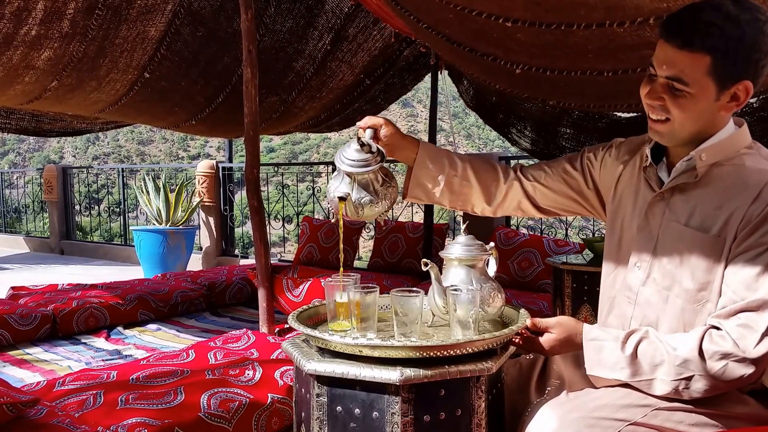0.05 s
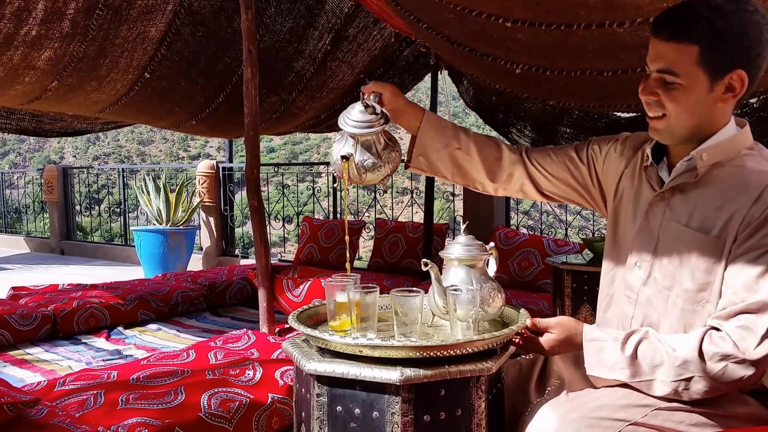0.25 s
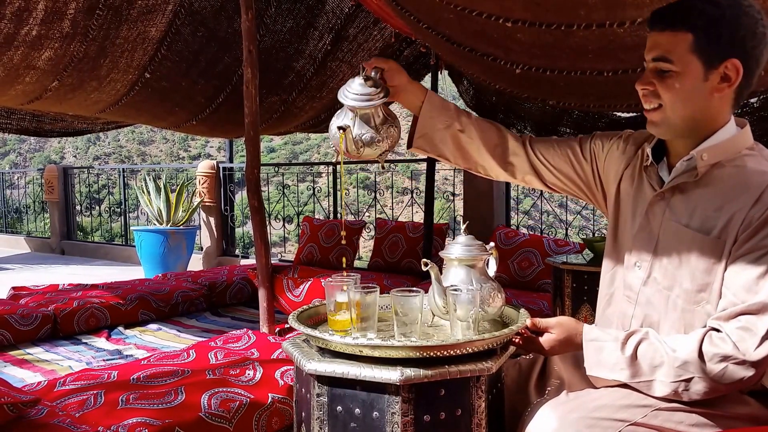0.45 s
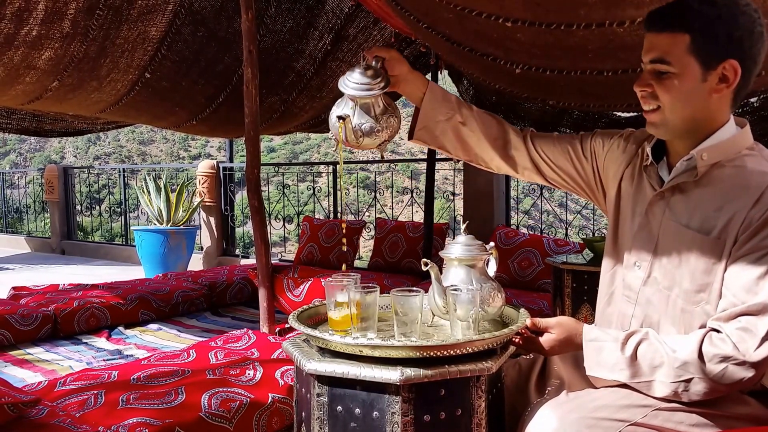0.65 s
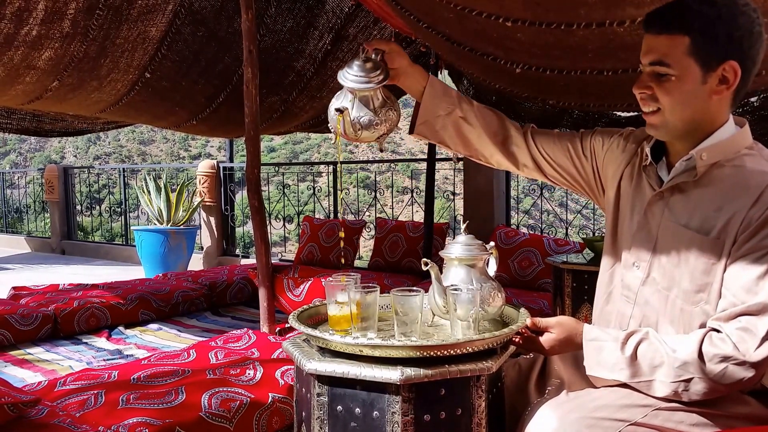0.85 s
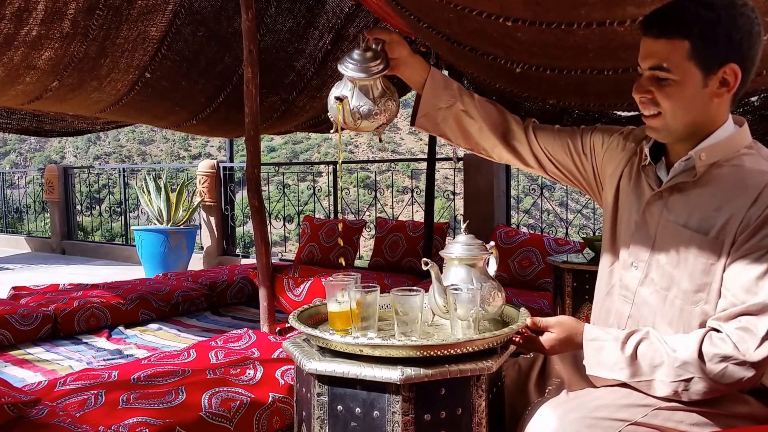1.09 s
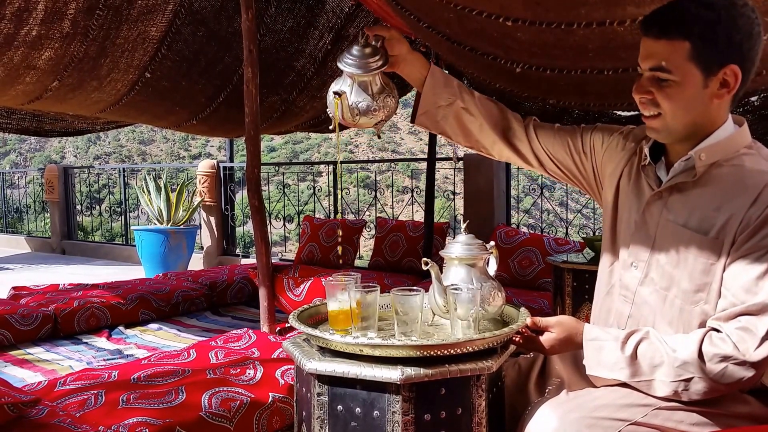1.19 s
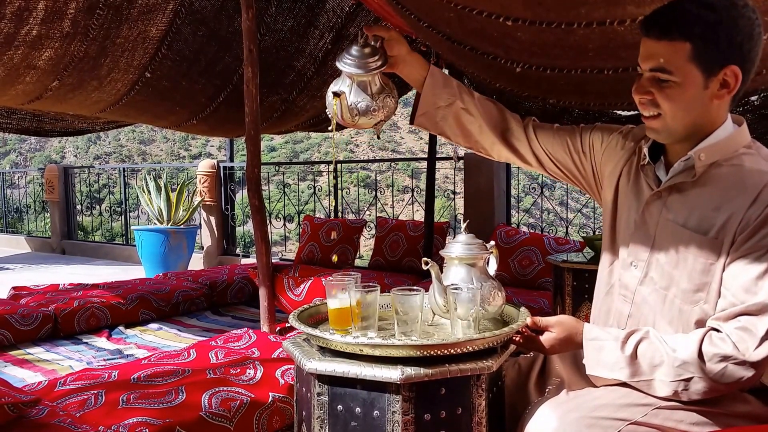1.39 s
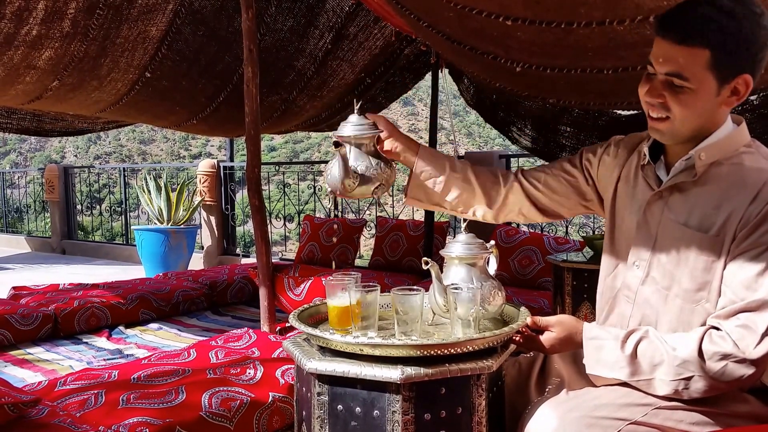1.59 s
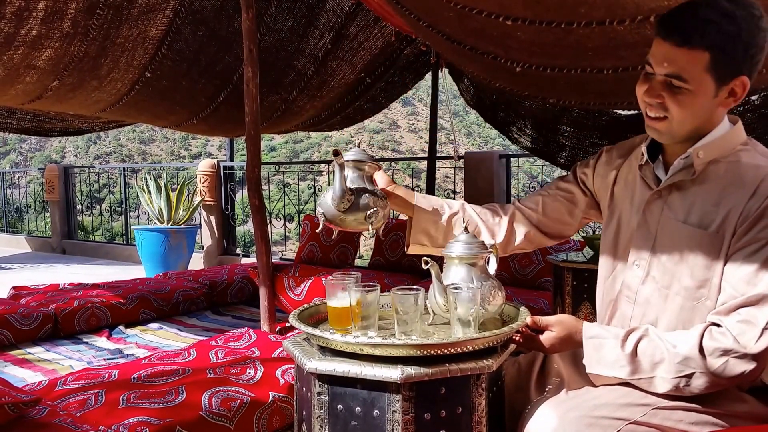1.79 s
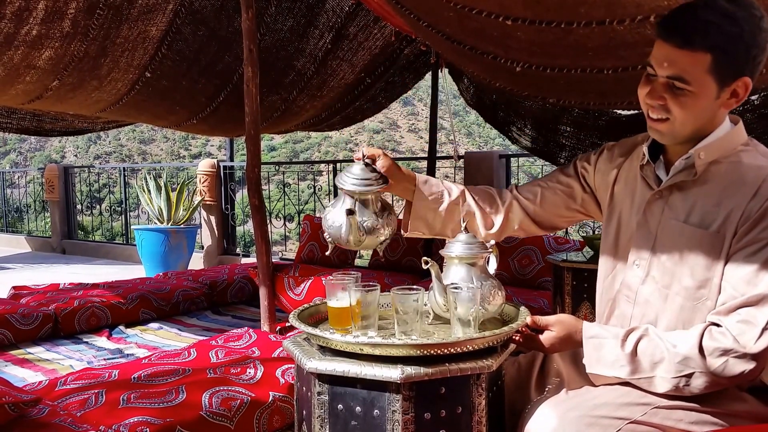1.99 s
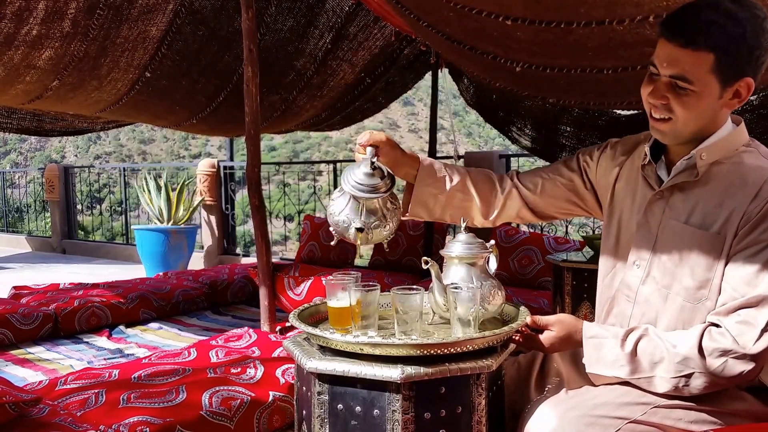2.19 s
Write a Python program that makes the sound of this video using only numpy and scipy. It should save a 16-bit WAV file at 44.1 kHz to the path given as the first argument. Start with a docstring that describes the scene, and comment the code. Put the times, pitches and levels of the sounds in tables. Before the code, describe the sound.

Tea pours from a raised pot into a small glass. A few drops grow into a thin, bubbling trickle that breaks into splashy drips and stops abruptly. It is heard nearby in an open tent, over faint outdoor rumble.

```python
"""Tea falls in a thin stream from a raised pot into a small glass on a metal tray, in an open tent.
The stream traps bubbles that ring for a few cycles, breaks into drops that tick and slap on the
surface, and stops. The air in the glass colours the splatter, ringing less as the tea rises.
Under the pour the tray drums and the air in the glass hums, over quiet outdoor rumble and hiss."""
import sys
import numpy as np
from scipy import signal
from scipy.fft import rfft, irfft
from scipy.io import wavfile
from scipy.ndimage import uniform_filter1d

SR = 44100
rng = np.random.default_rng(int(sys.argv[2]) if len(sys.argv) > 2 else 0)


def store_pcm(level_fs):
    """Save levels as 16-bit WAV."""
    pcm = np.round(np.clip(level_fs, -1, 1) * 32767).astype(np.int16)
    wavfile.write(sys.argv[1], SR, np.atleast_2d(pcm).T)


N = 99225


def amp(db):
    """Decibels to gain."""
    return 10 ** (np.asarray(db) / 20)


def unit_rms(x):
    """Scales to rms 1."""
    return x / np.sqrt(np.mean(x ** 2) + 1e-20)


def at_hz(curve, hz, column=1):
    """Reads a curve on a log-frequency axis."""
    columns = np.transpose(curve)
    return np.interp(np.log(hz + 1), np.log(columns[0] + 1), columns[column])


def fader(curve, column=1):
    """Gain at every sample from a dB curve."""
    columns = np.transpose(curve)
    return amp(np.interp(np.arange(N) / SR, columns[0], columns[column]))


def add(mix, start_s, sound):
    """Mixes a sound in at start_s."""
    part = mix[max(round(start_s * SR), 0):][:len(sound)]
    part += sound[:len(part)]


def impulse(eq, size=2048):
    """Minimum-phase impulse response of an EQ curve, with energy 1."""
    log_gain = np.log(amp(at_hz(eq, abs(np.fft.fftfreq(size, 1 / SR)))))
    response = np.fft.ifft(np.exp(np.conj(signal.hilbert(log_gain)))).real[:size // 2]
    return response / np.linalg.norm(response)


def impacts(per_s, spread_db):
    """Random impacts: many small, a few large."""
    hit = rng.random(N) < per_s / SR
    size = np.minimum(rng.exponential(1, N), np.pi)
    return hit * rng.choice([-1., 1.], N) * amp(spread_db * size)


def splash(colour, decay_s, size=600):
    """A short coloured noise burst whose loudest millisecond has rms 1."""
    noise = rng.standard_normal(size) * np.exp(-np.arange(size) / SR / decay_s)
    burst = signal.fftconvolve(noise, colour)
    return burst / np.sqrt(uniform_filter1d(burst ** 2, SR // 1000).max())


# Stereo image of the noise beds: freq_hz, likeness (0-1), left_minus_right_db
BED_STEREO = [(91, 0, 9), (196, 0.6, 4.5), (630, 0.19, -2), (3020, 0.1, 2), (11700, 0, 4)]


def noise_bed(eq):
    """Steady coloured noise, partly alike left and right."""
    hz = np.fft.rfftfreq(N, 1 / SR)
    left, other = rfft(rng.standard_normal((2, N)))
    likeness = at_hz(BED_STEREO, hz)
    right = likeness * left + np.sqrt(1 - likeness ** 2) * other
    pan = amp(at_hz(BED_STEREO, hz, column=2) / 2)
    return unit_rms(irfft(np.array([left * pan, right / pan]) * amp(at_hz(eq, hz)), N))


# Rumble fader: time_s, level_db
RUMBLE_FADER = [(0, -60.5), (0.4, -56), (1.7, -56), (1.85, -59), (2.25, -63)]
# Rumble tone: freq_hz, gain_db
RUMBLE_EQ = [(20, -27.5), (60, -5.5), (150, 0), (240, -7), (320, -12.5), (600, -22.5), (2000, -37.5),
             (16000, -68)]
# Hiss tone: freq_hz, gain_db
HISS_EQ = [(2000, -10), (5800, -13), (6700, 3.5), (7900, 1.5), (9000, -7), (14000, -37)]


def outdoors():
    """A low rumble swells and eases under a steady, distant hiss."""
    return fader(RUMBLE_FADER) * noise_bed(RUMBLE_EQ) + amp(-82.5) * noise_bed(HISS_EQ)


def patter(decay_s=.003):
    """Flutter of the flow: a steady share for the unbroken stream, plus a fading kick per drop."""
    fade = np.exp(-np.arange(SR // 20) / SR / decay_s)
    kicks = signal.oaconvolve(abs(impacts(per_s=110, spread_db=.5)), fade)[:N]
    return unit_rms(1 + unit_rms(kicks))


def bubble(pitch_hz, ring_s, rise_per_s=4):
    """A trapped bubble swells, rings for a few cycles and rises in pitch."""
    t = np.arange(0, 5 * ring_s, 1 / SR)
    age = t / (.44 * ring_s)
    envelope = age ** .88 * np.exp(-age ** 1.52)
    glide = 1 + rise_per_s * (t - ring_s / 2)
    return envelope / envelope.max() * np.sin(2 * np.pi * pitch_hz * np.cumsum(glide) / SR)


def glass_ring(splatter, pitch_hz=2197, width_hz=220, fade_db_per_s=12.5):
    """Splashes excite the main ring of the glass, which the rising tea damps."""
    ringing = signal.lfilter(*signal.iirpeak(pitch_hz, pitch_hz / width_hz, fs=SR), splatter)
    return amp(5.5 - fade_db_per_s * np.arange(N) / SR) * unit_rms(ringing)


# Colour of the air in the glass: freq_hz, gain_db
GLASS_EQ = [(200, -23), (500, -7.5), (650, -15), (800, -6), (1000, -4), (1360, -1), (1500, -13),
            (1740, -11.5), (1950, 0), (2280, 0), (2480, -9.5), (2800, -4), (3700, -5.5), (4300, -15),
            (7200, -17), (9000, -31), (16000, -78)]
# Faders of the pour: time_s, stream_gain_db, spray_gain_db
FLOW_FADERS = [(0.13, -91, -99), (0.21, -70, -71), (0.29, -62, -60.5), (0.42, -56.5, -63.5),
               (0.56, -52.5, -62.5), (0.7, -49, -59.5), (0.87, -52, -60.5), (1.1, -52, -64),
               (1.27, -54, -58), (1.71, -54.5, -61), (1.745, -68.5, -75), (1.9, -105, -110)]
# Treble shelf on the stream: time_s, gain_db
TREBLE_FADER = [(0.45, 1), (0.68, 2.5), (0.9, 3), (1.6, 0.5)]


def stream(flutter, pitches=36, bubbles_per_s=600, shelf_hz=2580):
    """Small bubbles and splatter follow the flow and brighten as the pot is lifted."""
    bubbles = np.zeros(N)
    for hz in np.geomspace(750, 4300, pitches):
        cycles = 3.75 * rng.uniform(.6, 1.4)
        births = impacts(bubbles_per_s / pitches, spread_db=5.5)
        bubbles += amp(at_hz(GLASS_EQ, hz)) * hz * signal.oaconvolve(births, bubble(hz, cycles / hz))[:N]
    hits = flutter * impacts(per_s=1600, spread_db=4)
    splatter = signal.oaconvolve(hits, impulse(GLASS_EQ))[:N]
    body = amp(-1) * unit_rms(bubbles) + amp(-3.5) * unit_rms(splatter) + glass_ring(splatter)
    lows = signal.sosfiltfilt(signal.butter(4, shelf_hz, fs=SR, output="sos"), body)
    return fader(FLOW_FADERS) * (lows + fader(TREBLE_FADER) * (body - lows))


# Crisp tone of spray and drops: freq_hz, gain_db
SMACK_EQ = [(300, -4), (1200, 0), (2200, -6.5), (3200, -3.5), (4300, 4.5), (5400, 4.5), (6300, -7.5),
            (7600, 1.5), (8600, 2), (9800, 2.5), (11000, -1), (12400, -3.5), (16000, -13)]


def spray(flutter, spots=5, splats_per_s=980):
    """Clusters of soft splats land at several spots in the glass, each with its own echoes."""
    smack = impulse(SMACK_EQ)
    gain = fader(FLOW_FADERS, column=2) * amp(-5.5) / np.sqrt(spots)
    layers = []
    for _ in range(spots):
        hits = flutter * impacts(splats_per_s / spots, spread_db=5)
        layers.append(signal.oaconvolve(hits, splash(smack, decay_s=.00035))[:N])
    return sum(tent(gain * unit_rms(splats), tray_db=-4.5) for splats in layers)


# Drops hitting glass or tea: start_s, relative_level_db
DROP_HITS = [(0.142, -58), (0.1952, -59), (0.2268, -64), (0.2363, -61), (0.2684, -60.5), (0.2767, -57),
             (0.3744, -54), (0.476, -51.5), (0.545, -46.5), (0.59, -53), (0.6582, -45.5), (0.723, -50),
             (0.827, -48.5), (0.9594, -53.5), (1.013, -49.5), (1.048, -54), (1.09, -45), (1.1219, -55),
             (1.4376, -52), (1.474, -45.5), (1.5311, -47.5), (1.5635, -45.5), (1.5786, -53),
             (1.7062, -51.5), (1.7161, -51.5)]
# Ring of the nearly empty glass: pitch_hz, relative_level_db, t60_s
EMPTY_GLASS_MODES = [(2020, -5, 0.055), (5540, 1, 0.0091)]


def drops(covered_s=.33):
    """Drops smack sharply; they also ring the bare glass until tea covers the bottom."""
    out, smack = np.zeros(N), impulse(SMACK_EQ)
    t = np.arange(SR // 10) / SR
    ping = sum(amp(db - 60 * t / t60) * np.sin(2 * np.pi * hz * t) for hz, db, t60 in EMPTY_GLASS_MODES)
    for start_s, level_db in DROP_HITS:
        gain = amp(level_db + 3.5)
        add(out, start_s, gain * splash(smack, decay_s=.0007))
        if start_s < covered_s:
            add(out, start_s, gain * ping)
    return out


# Fader of the drumming and hum: time_s, level_db
DRUM_HUM_FADER = [(0.15, -80), (0.245, -56.5), (1, -53), (1.7, -55), (1.82, -69)]
# Lows from the tray, a peak near 800 Hz from the air in the glass: freq_hz, gain_db
DRUM_HUM_EQ = [(90, -25.5), (170, -4), (220, -1.5), (310, -12.5), (600, -23.5), (790, -17), (1100, -34),
               (3000, -69.5)]


def drum_and_hum():
    """Low drumming of the tray, with a steady hum of the air in the glass near 800 Hz."""
    return fader(DRUM_HUM_FADER) * noise_bed(DRUM_HUM_EQ)


# The largest trapped bubbles: start_s, relative_level_db, pitch_hz, ring_s
BUBBLE_NOTES = [(0.174, -57, 2050, 0.0038), (0.1954, -54, 2070, 0.0055), (0.2268, -58, 2020, 0.0049),
                (0.242, -59, 2050, 0.0043), (0.269, -44.5, 2100, 0.0028), (0.3095, -42, 2100, 0.0066),
                (0.327, -36.5, 2150, 0.0038), (0.3494, -34, 2040, 0.0057), (0.355, -40, 2230, 0.0073),
                (0.3703, -32, 1840, 0.0027), (0.383, -35, 2260, 0.0056), (0.4066, -38, 2080, 0.0049),
                (0.456, -38, 2180, 0.0033), (0.4778, -34.5, 1830, 0.0012), (0.503, -41, 2190, 0.0041),
                (0.516, -35.5, 2070, 0.0017), (0.5238, -43, 2190, 0.0051), (0.589, -40.5, 1440, 0.0039),
                (0.601, -41.5, 2280, 0.0043), (0.632, -41.5, 2200, 0.003), (0.671, -38.5, 2300, 0.0035),
                (0.6808, -38.5, 1270, 0.0027), (0.6988, -34, 2340, 0.003), (0.7085, -29.5, 1940, 0.0024),
                (0.7397, -30.5, 1610, 0.0015), (0.807, -30, 2144, 0.0018), (0.8136, -40, 2260, 0.0016),
                (0.878, -42, 2040, 0.0028), (0.892, -40, 2040, 0.0036), (0.9435, -27, 2020, 0.0016),
                (0.9584, -33.5, 2430, 0.0014), (1.0088, -38.5, 1430, 0.0051), (1.055, -40, 1220, 0.0012),
                (1.0866, -32, 2430, 0.001), (1.104, -45.5, 1200, 0.0064), (1.116, -37, 3340, 0.0015),
                (1.213, -36.5, 3130, 0.0012), (1.3225, -42, 2100, 0.0025), (1.334, -37, 3020, 0.0013),
                (1.367, -40, 1320, 0.0022), (1.415, -35, 2620, 0.0016), (1.4787, -32, 2860, 0.00083),
                (1.5076, -32.5, 2170, 0.0014), (1.603, -37, 2180, 0.0011), (1.656, -38, 1230, 0.0019)]


def large_bubbles():
    """Each large bubble opens with a splash in the glass and rings as a short blip."""
    out, glass = np.zeros(N), impulse(GLASS_EQ)
    for start_s, level_db, pitch_hz, ring_s in BUBBLE_NOTES:
        add(out, start_s, amp(level_db + 1.5) * bubble(pitch_hz, ring_s))
        add(out, start_s, amp(level_db - 10) * splash(glass, decay_s=.0006))
    return out


# Heavy drops from the broken stream: start_s, level_db
SLAP_HITS = [(1.4065, -29), (1.5082, -29.5)]
# Slap tone: freq_hz, gain_db
SLAP_EQ = [(500, -39), (1600, -11), (2400, -3), (3500, 6), (6000, -24), (10800, -17), (16000, -34.5)]


def slaps():
    """A heavy drop hits the tea with a short, bright slap."""
    out, colour = np.zeros(N), impulse(SLAP_EQ)
    for start_s, level_db in SLAP_HITS:
        add(out, start_s, amp(level_db) * splash(colour, decay_s=.00092))
    return out


# Stereo phase of the glass: freq_hz, left_lead_rad
GLASS_PHASE = [(20, -3), (950, 0.62), (1500, -0.5), (1850, -5.5), (2350, -5), (2650, -9.5), (3700, -7.5),
               (4400, -11.5), (9000, -15), (16000, -28)]
# Pan of the glass: freq_hz, left_minus_right_db
GLASS_PAN = [(300, -7), (800, 3.5), (1300, 3), (1750, -2.5), (2200, 2.5), (3200, 2), (4300, -2), (5300, -3),
             (7800, 4), (10000, -10), (13000, -3)]
# Reverb time of the tent: freq_hz, t60_s
TENT_DECAY = [(200, 0.79), (1000, 0.4), (4000, 0.34), (14000, 0.41)]


def tent(dry, tray_db, tail_db=-8.5, scatter_s=.0019, size=16384):
    """Direct sound, quick scatter off the tray and glasses, and a short soft tail."""
    t, hz = np.arange(size) / SR, np.fft.rfftfreq(size, 1 / SR)
    scatter = rng.standard_normal((2, size)) * np.exp(-t / scatter_s) * (t > .0005)
    late_noise = rng.standard_normal((2, size)) * (t > .004)
    band_hz, frame_s, bands = signal.stft(late_noise, SR, nperseg=256)
    decay = amp(-60 * frame_s / at_hz(TENT_DECAY, band_hz)[:, None])
    tail = signal.istft(bands * decay, SR, nperseg=256)[1][:, :size]
    echoes = sum(amp(db) * echo / np.linalg.norm(echo, axis=1, keepdims=True)
                 for db, echo in [(tray_db, scatter), (tail_db, tail)])
    sides = np.array([[.5], [-.5]])
    direct = np.exp(1j * sides * at_hz(GLASS_PHASE, hz))
    pan = amp(sides * at_hz(GLASS_PAN, hz))
    lead_in = size // 64  # room for the side that arrives early
    response = np.roll(irfft((direct + rfft(echoes)) * pan), lead_in, axis=1)
    return signal.fftconvolve(dry[None], response, axes=1)[:, lead_in:lead_in + N]


def scene():
    """The pour in the tent, with drumming tray and humming glass, over rumble and distant hiss."""
    flutter = patter()  # shared, so splatter and spray cluster together
    pour = tent(large_bubbles(), tray_db=-7)
    pour += tent(slaps(), tray_db=-7)
    pour += tent(drops(), tray_db=-4)
    pour += tent(stream(flutter), tray_db=-2.5)
    return pour + spray(flutter) + drum_and_hum() + outdoors()


def record(dry):
    """A steep low-pass trims the highest treble."""
    cutoff_hz = 16250
    lowpass = signal.firwin(511, cutoff_hz, window=("kaiser", 9), fs=SR)
    return signal.oaconvolve(dry, lowpass[None], "same")


dry = scene()
out = record(dry)
store_pcm(out)
```